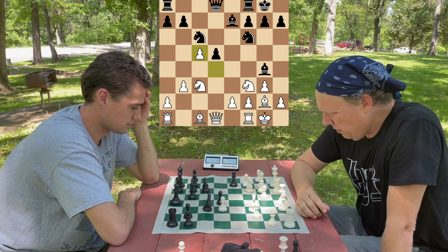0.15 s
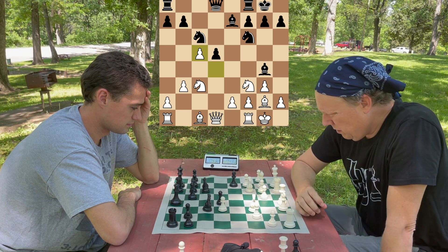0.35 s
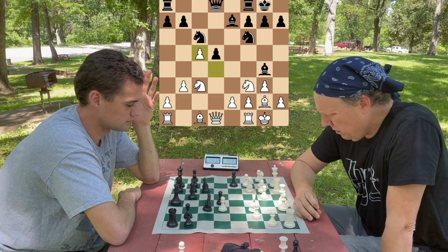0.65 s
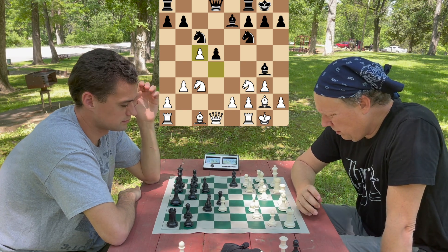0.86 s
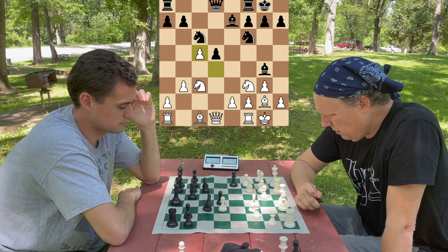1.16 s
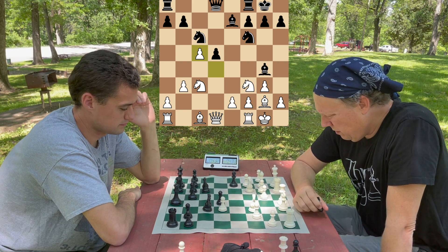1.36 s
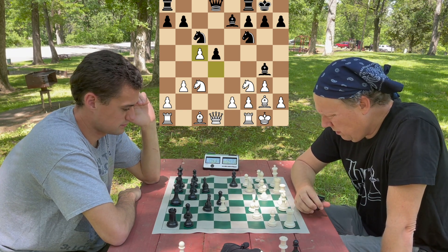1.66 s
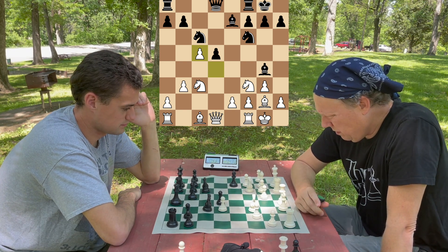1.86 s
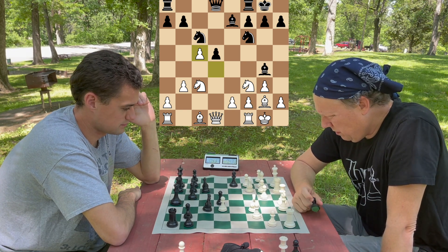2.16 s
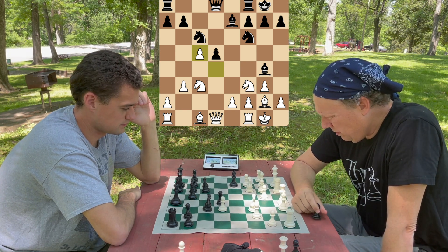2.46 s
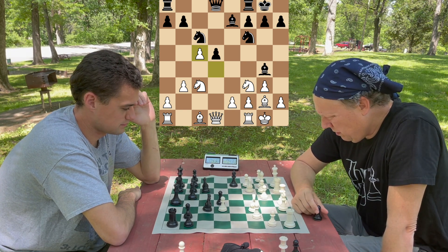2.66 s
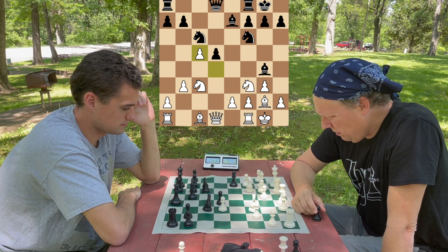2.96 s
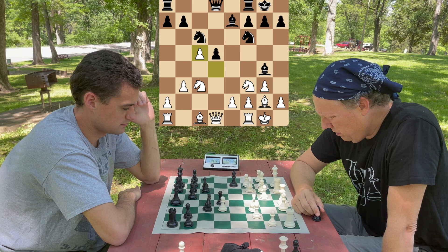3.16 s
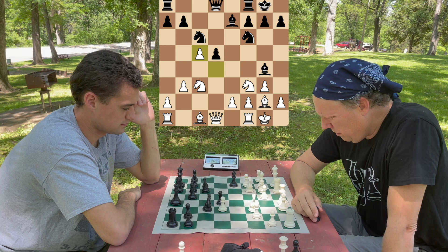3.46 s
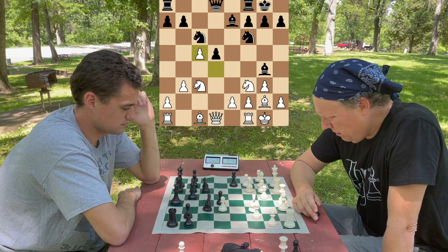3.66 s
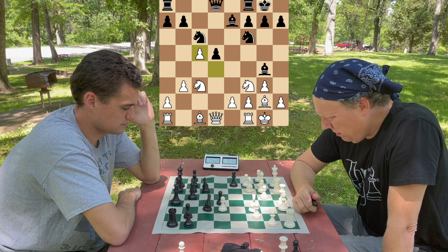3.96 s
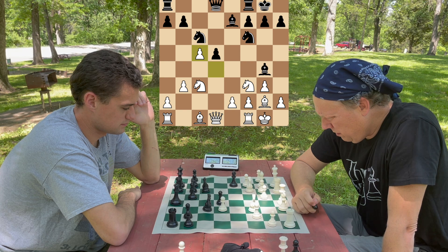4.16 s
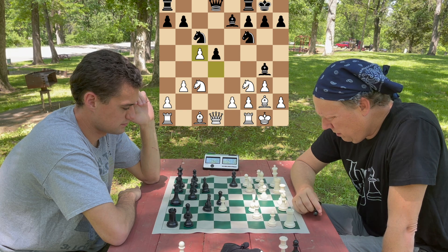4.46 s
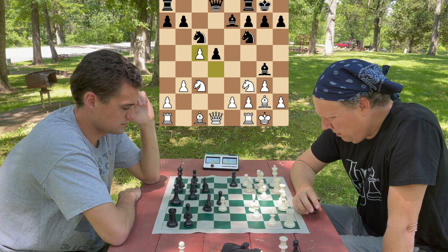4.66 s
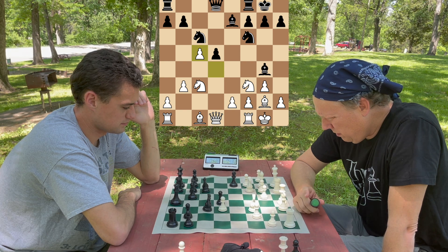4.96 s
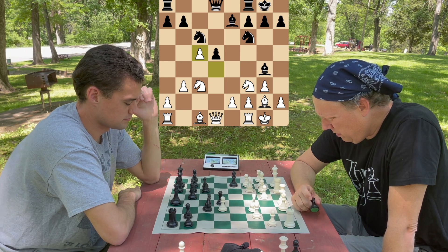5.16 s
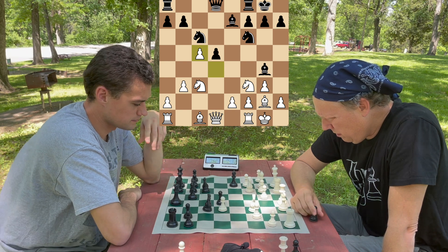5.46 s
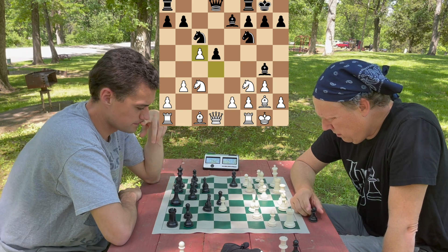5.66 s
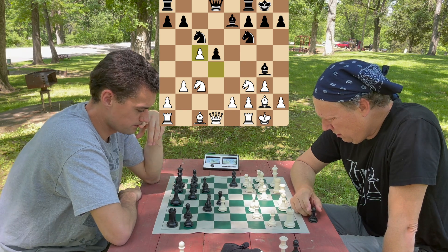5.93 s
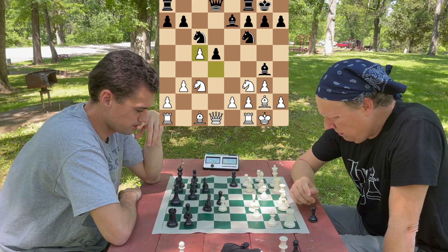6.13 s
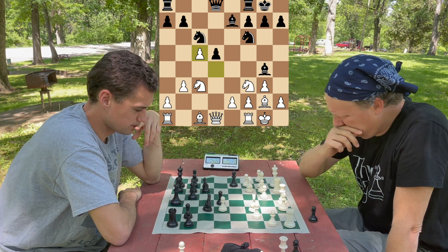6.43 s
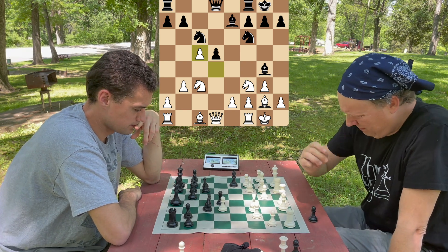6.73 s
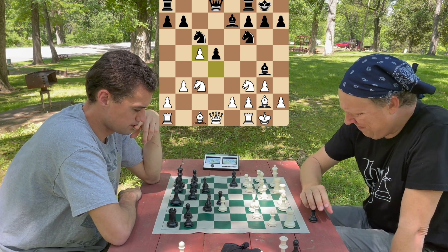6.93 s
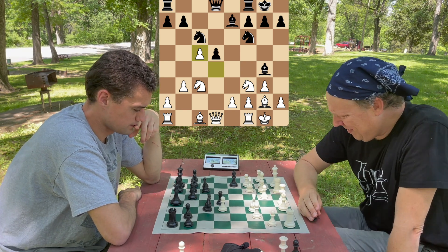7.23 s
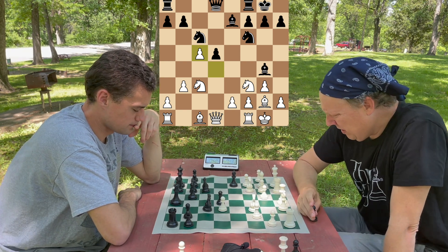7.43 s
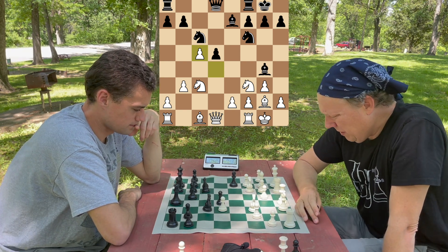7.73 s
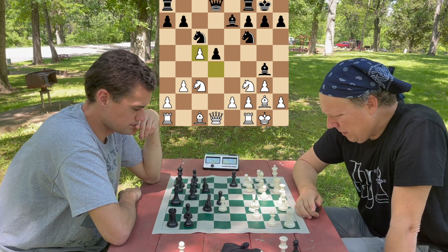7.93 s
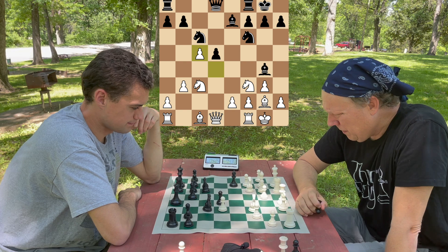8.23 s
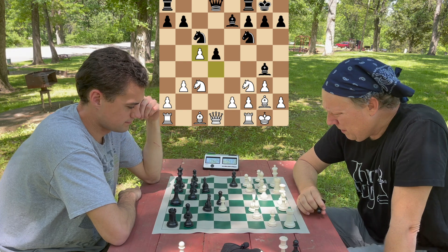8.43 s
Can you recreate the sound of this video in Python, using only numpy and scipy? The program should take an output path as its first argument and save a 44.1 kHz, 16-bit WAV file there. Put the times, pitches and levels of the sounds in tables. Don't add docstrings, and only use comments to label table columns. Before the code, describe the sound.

Close at an outdoor wooden table, a weighted plastic piece lands with a bright, sharp clack early on, then small ticks follow. A second, softer and duller knock comes past the middle, then faint bumps and cloth rustle. A nearby songbird whistles falling notes in the first two seconds, echoing off trees; farther birds continue over distant traffic hum and low wind rumble.

```python
import sys
import numpy as np
from scipy import signal
from scipy.fft import rfft, irfft
from scipy.io import wavfile
from scipy.ndimage import uniform_filter1d

SR = 44100
rng = np.random.default_rng(int(sys.argv[2]) if len(sys.argv) > 2 else 0)


def gain_from_db(level_db):
    decades = np.asarray(level_db, float) / 20
    return 10 ** decades


def generate_wav(signal):
    frames = np.transpose(np.atleast_2d(signal))
    scaled = np.clip(frames, -1, 1) * 32767
    pcm = np.round(scaled).astype(np.int16)
    wavfile.write(sys.argv[1], SR, pcm)


N = 378819

# (time [s], strength [dB], contact time [ms], plastic crack [dB])
FIRST_KNOCK = [
    (.5439, -14, 0.29, -18),
    (.5470, -22, 0.34, -35),
    (.5500, -26, 0.66, -39),
]
SECOND_KNOCK = [
    (5.3183, -18, 0.4, -44),
    (5.3214, -24.5, 0.51, -51),
    (5.3240, -23.5, 0.32, -54),
]
# (frequency [Hz], level [dB], time to fall 60 dB [s])
FIRST_PLANKS = [(435, -6, 0.073), (507, 0, 0.08), (690, -14, 0.088), (914, -22.5, 0.068), (1160, -10, 0.05),
                (1328, 0.5, 0.034), (1970, 1.5, 0.015), (2400, -2, 0.028), (2600, -0.5, 0.015),
                (3150, -3, 0.018)]
SECOND_PLANKS = [(277, -9, 0.11), (429, 2, 0.053), (486, -5, 0.074), (680, -30, 0.162), (850, -23, 0.12),
                 (947, -8, 0.057), (1120, -2.5, 0.022), (1317, 3.5, 0.024), (1600, -12, 0.024),
                 (2090, 3, 0.0043), (2900, -3.5, 0.0039)]
# (frequency [Hz], level [dB], time to fall 60 dB [s])
PLASTIC = [
    [(4600, -5.5, 0.014), (5070, 9, 0.0076), (5200, 9, 0.0056), (5560, 3.5, 0.0063), (6250, -1.5, 0.0066), (8390, -14, 0.01), (9430, -19, 0.0089), (10700, -32, .006), (12200, -21, 0.01), (13400, -30, 0.0047), (15000, -28, .007)],
    [(4500, -1.5, 0.0115), (5300, -4, 0.0082), (6600, -4, 0.0082), (8400, -6, 0.0197), (9000, -4.5, 0.021), (10900, -14.5, 0.0107), (12370, -8, 0.0195), (15300, -13.5, .012)],
]
# (time [s], peak level [dB], centre [Hz], plastic ring [dB])
TICKS = [(0.816, -56.5, 3490, -33.5), (0.9198, -46, 4000, -16), (1.5595, -39, 3350, -23),
         (1.9778, -39.5, 4100, -41), (1.9790, -41, 2400, -45), (1.982, -46, 3580, -41),
         (2.9644, -59, 3520, -27), (3.5827, -58, 3520, -24), (4.2328, -57, 3660, -28),
         (4.2777, -52, 3440, -31.5), (4.3785, -50, 3680, -31.5), (4.5719, -60, 4130, -10),
         (5.222, -58, 3700, -21), (5.2255, -45, 3900, -39.5), (5.226, -43, 2000, -45),
         (5.3396, -46, 3450, -34.5), (7.009, -59, 3420, -28), (7.3864, -57, 5000, -26),
         (7.66, -56, 2300, -40), (7.043, -63, 6000, -30), (7.6241, -59.5, 4090, -24),
         (8.2058, -53.5, 3490, -8), (8.3706, -53.5, 4400, -29)]
# (time [s], peak level [dB], frequency [Hz], time to fall 60 dB [s])
THUMPS = [
    (0.545, -26, 102.6, 0.058),
    (.545, -36, 32.4, 0.27),
    (5.319, -37.5, 108.6, 0.081),
    (7.039, -39, 421, 0.028),
    (7.36, -43.5, 477.5, 0.042),
    (7.549, -56, 337, 0.075),
]
# (time [s], length [s], centre [Hz], level [dB])
RUBS = [(2.849, .06, 11000, -85), (3.545, 0.064, 9900, -81), (6.175, 0.068, 12500, -80),
        (6.18, .05, 7500, -83), (6.286, 0.046, 12500, -80), (6.56, .07, 14200, -82),
        (6.509, 0.07, 13000, -78), (6.581, 0.057, 12400, -82), (7.0, 0.056, 12000, -84.5),
        (7.337, 0.037, 11000, -77), (7.508, 0.088, 12500, -80), (7.644, .025, 12000, -82),
        (6.522, .04, 7000, -80), (6.6, .03, 7500, -83), (7.328, .04, 6000, -79), (7.54, .04, 6500, -79)]
# (time [s], length [s], frequency [Hz], level [dB])
METAL_PARTIALS = [
    (1.955, 0.13, 4500, -67.5),
    (1.975, .065, 7150, -81),
    (1.95, .1, 11600, -84),
]

# (time [s], pitch [Hz], level [dB])
SWOOPS = [
    [(0.166, 3696, -70.5), (0.2, 3399, -54), (0.214, 3176, -48.5), (0.226, 2682, -61), (0.248, 2047, -64)],
    [(1.145, 3656, -77), (1.151, 3648, -64.5), (1.179, 3409, -52.5), (1.197, 3122, -49.5),
     (1.235, 2040, -69)],
    [(1.618, 3560, -76), (1.646, 3256, -52.5), (1.66, 2959, -51), (1.702, 2772, -58), (1.735, 2762, -64)],
    [(5.33, 3230, -74), (5.35, 3080, -69), (5.365, 2900, -62.5), (5.385, 2660, -74)],
    [(6.995, 3350, -78), (7.03, 3010, -67.5), (7.05, 2690, -64), (7.07, 2640, -77)],
]
# (time [s], length [s], middle pitch [Hz], level [dB])
NEAR_DROPS = [(.035, .04, 2570, -59), (.068, 0.026, 2400, -54.5), (.09, .029, 2430, -56),
              (.574, 0.009, 2990, -47), (.64, .0087, 2890, -49.5), (1.006, 0.032, 2600, -52.5),
              (1.04, 0.0274, 2540, -52), (1.07, 0.03, 2504, -51.5), (1.09, 0.012, 2483, -50),
              (1.535, 0.032, 2430, -54)]
NEAR_FLICKS = [(.514, 0.0094, 3010, -51.5), (.527, 0.018, 2980, -45), (.592, .016, 3090, -42)]
NEAR_ARCHES = [(1.495, .013, 3530, -57.5), (1.512, .019, 3216, -46.5)]
NEAR_HELD = [(.005, 0.047, 2610, -68), (.549, 0.025, 3423, -44), (.7, 0.058, 3470, -65),
             (.775, 0.018, 3480, -64), (.583, .006, 3250, -55), (.61, .015, 3430, -46),
             (.624, .017, 3520, -50), (.64, 0.052, 3510, -61), (.662, 0.049, 2263, -55.5),
             (.896, 0.051, 3130, -64), (.986, 0.03, 2650, -58), (1.565, 0.023, 2600, -56)]
# (time [s], length [s], middle pitch [Hz], level [dB])
FAR_DROPS = [(2.08, 0.029, 3430, -61.5), (2.195, 0.02, 3480, -64), (4.17, .0423, 2000, -68.5),
             (7.503, 0.0197, 3130, -60), (7.57, .03, 3300, -76), (7.62, .03, 2600, -73),
             (7.325, .025, 3200, -69), (7.113, .02, 4200, -81), (7.1, .02, 3200, -69), (7, .02, 3000, -69),
             (6.7, .015, 2950, -69)]
FAR_SAGS = [(2.16, 0.026, 4070, -69), (2.8, 0.094, 2080, -73), (3.05, .03, 4220, -78),
            (5.1, 0.048, 2860, -76), (5.5, .1, 3500, -73), (6.49, 0.065, 3220, -71),
            (7.25, 0.036, 2860, -69), (7.28, .069, 4120, -75), (7.43, 0.029, 2910, -68),
            (7.47, .038, 4050, -72), (7.76, 0.036, 3240, -72), (7.92, 0.019, 2310, -65),
            (8.48, .028, 4500, -73), (8.5, .046, 2590, -76), (8.572, 0.021, 4350, -66)]
FAR_LIFTS = [(2.045, 0.031, 4080, -63.5), (3.15, .06, 3400, -81), (3.22, .06, 3750, -79),
             (3.27, .05, 4400, -78), (3.32, .045, 3450, -78), (3.19, .03, 4200, -80),
             (3.27, .03, 3050, -81), (4.25, .054, 2770, -73), (6.22, .05, 3480, -80),
             (6.41, .0262, 3320, -73), (7.52, 0.023, 2400, -69)]
FAR_HELD = [(1.02, 0.057, 10900, -86), (3.1, .08, 2580, -75), (5.6, .2, 5000, -83), (6.3, .07, 5300, -82),
            (7.27, .3, 5200, -83), (5.93, .06, 4400, -79), (6.04, .06, 3400, -75), (6.66, .06, 2600, -74),
            (7.88, .07, 2500, -77), (7.13, .1, 3500, -78), (7.55, .12, 4050, -80), (5.27, .132, 10940, -86),
            (5.45, .12, 8300, -88), (7.69, .04, 3150, -75), (7.62, .08, 5350, -78), (8.4, .03, 3250, -73),
            (5.398, .012, 2950, -70), (5.9, .01, 2900, -68), (5.422, 0.011, 2950, -72),
            (6.68, .1, 3560, -78), (5.35, .08, 7900, -82)]
FAR_PLUNGES = [(2.74, .0138, 8750, -71), (5.393, .017, 8660, -79)]
FAR_HOOKS = [(8.265, 0.059, 3470, -63.5)]
FAR_GLIDES = [(8.4, .065, 2920, -67), (4, .05, 2650, -74)]
FAR_SETTLES = [(5.915, .085, 2960, -71), (6.1, 0.073, 2960, -71), (6.58, .075, 2590, -71.5),
               (7.8, .093, 2560, -71)]
DROP, FLICK, ARCH, HELD = (0.093, -0.072), (-0.14, 0.12), (-0.17, -0.12), (-.015, .003)
FAR_DROP, SAG, LIFT, PLUNGE = (0.121, -.1), (.03, -.025), (-0.064, 0.028), (0.185, -0.082)
HOOK, GLIDE, SETTLE = (0.1, -.003), (0.081, -0.065), (-0.0464, -0.0064)
# (time [s], level [dB])
BUZZY_CALLS = [(2.9, -74), (3.385, -70.5), (3.905, -71), (4.435, -71), (5.0, -75), (5.46, -75)]
# (share of its length [0-1], pitch [Hz], level [dB])
BUZZY_SHAPE = [(0, 4397, -4), (.14, 4700, -0.5), (.38, 3650, 0), (.48, 3150, 0), (.64, 3620, 2.5),
               (.74, 3600, -11), (.84, 3270, 3), (1, 3150, -3)]
# (time [s], level [dB])
CHATTER_LEVEL = [(0, -85), (2, -95), (3.2, -82), (4.3, -84), (5.0, -92), (5.55, -80), (6.1, -76.5),
                 (6.9, -81.5), (7.5, -73), (8.0, -76), (8.59, -75.5)]

# (time [s], wind on the microphone [dB], breeze in the leaves [dB], traffic [dB])
AIR = [(0, 0.5, 1, -59.5), (.35, 2.5, 3, -59.5), (1.2, 1.5, 2, -59.5), (2.1, 0, 2.5, -60),
       (2.6, 0.5, -1, -60.5), (3.2, -0.5, 4, -62), (3.6, 0.5, 0, -62.5), (4.1, 0, -1, -63),
       (4.5, 1, 4.5, -63.5), (4.9, -0.5, -2.5, -63), (5.4, 0, 5, -63.5), (5.8, -1.5, 0.5, -62.5),
       (6.94, -0.5, -1, -62.5), (7.5, 1.5, 9, -62), (7.85, 0, 3, -62.5), (8.59, 1, 3, -62)]
# (frequency [Hz], level per Hz [dB])
WIND_COLOUR = [(8.8, -37.5), (15, -1), (27, 4), (44, -3.5), (80, -0.5), (151, -9.5), (211, -15.5),
               (228, -15.5), (249, -27), (300, -23.5), (390, -36.5), (660, -120)]
TRAFFIC_COLOUR = [(120, -31), (200, 0), (227, -5.5), (248, -10), (386, -8), (567, -8.5), (628, -4.5),
                  (806, -6), (1070, -7.5), (1160, -8.5), (2060, -15), (2290, -19.5), (3000, -28),
                  (3900, -32), (6600, -120)]
LEAVES_COLOUR = [(1500, -31.5), (2500, -1), (4000, -4.5), (5500, -10), (7300, -16.5), (10000, -19),
                 (14700, -20.5), (15300, -37), (16200, -48.5)]
# (frequency [Hz], width [Hz], level [dB])
ENGINES = [
    (72, 17.3, -61.5),
    (667, 40, -75),
]
# (time [s], level [dB])
PASSING_VEHICLE = [
    (0, -83),
    (2.0, -84),
    (2.4, -73),
    (3.0, -64.5),
    (3.2, -85),
    (8.59, -89),
]


def clock(seconds):
    return np.arange(int(seconds * SR)) / SR


def add(track, at, sound):
    start = max(int(at * SR), 0)
    track[start:start + len(sound)] += sound[:N - start]


def fade_away(t60, t):
    return np.exp(-np.log(1000) * t / t60)


def ring(hz, t60, t):
    return np.sin(2 * np.pi * hz * t) * fade_away(t60, t)


def sweep(hz):
    return np.sin(2 * np.pi * np.cumsum(hz) / SR)


def passband(x, hz, width):
    edges = np.clip([hz - width / 2, hz + width / 2], 500, 20000)
    y = signal.sosfilt(signal.butter(3, edges, "bandpass", fs=SR, output="sos"), x)
    return y / np.abs(y).max()


def walk(rate):
    hold = int(SR / rate)
    steps = np.repeat(rng.standard_normal(N // hold + 1), hold)
    smooth = uniform_filter1d(uniform_filter1d(steps, hold), hold)
    return 0.81 * smooth[:N]


def echoes(x, t60, wet_db, delay):
    t = clock(0.93)
    tail = rng.standard_normal(len(t)) * fade_away(t60, t) * (t > delay)
    tail = tail / np.sqrt(np.sum(tail ** 2))
    return gain_from_db(wet_db) * signal.fftconvolve(x, tail)[:N]


def swell(hz, t, lag=0.0079):
    return 1 - np.exp(-t / (lag * (500 / hz) ** 3))


def knock(contacts, planks, plastic):
    wood, crack, t = np.zeros(N), np.zeros(N), clock(.3)
    grits = rng.standard_normal((len(contacts), 200)) * np.exp(-t[:200] / .00006)
    grits = grits / np.abs(rfft(grits, axis=1))[:, 20:45].mean(axis=1, keepdims=True)
    plastic_ring = sum((-1) ** k * gain_from_db(db) * ring(hz, t60, t) for k, (hz, db, t60) in enumerate(plastic))
    chances = rng.standard_normal((len(contacts), len(planks)))
    for (at, db, contact_ms, crack_db), chance, grit in zip(contacts, chances, grits):
        tilt_db = 4.3 * (at > contacts[0][0])
        body = np.zeros(len(t))
        for (hz, mode_db, t60), luck in zip(planks, chance):
            level_db = mode_db + 2.8 * luck + tilt_db * min(np.log2(hz / 1100), 0)
            body += gain_from_db(level_db) * ring(hz, t60, t) * swell(hz, t)
        push = np.sin(np.pi * np.clip(t[:90] * 1000 / contact_ms, 0, 1)) ** 2
        add(wood, at, -gain_from_db(db) * np.convolve(body, push / push.sum()))
        add(crack, at, gain_from_db(crack_db - 8.5) * np.convolve(plastic_ring, grit))
    wood = signal.sosfilt(signal.butter(2, 240, "highpass", fs=SR, output="sos"), wood)
    dull = signal.sosfilt(signal.butter(6, 3500, fs=SR, output="sos"), wood)
    nearby = echoes(dull, t60=0.035, wet_db=-11.5, delay=0.00335)
    trees = echoes(dull, t60=0.88, wet_db=-34, delay=0.017)
    return wood + crack + nearby + trees


def ticks(width_hz=1930, t60=0.016):
    out, t = np.zeros(N), clock(0.24)
    for at, db, hz, ring_db in TICKS:
        burst = rng.standard_normal(len(t)) * fade_away(t60, t)
        add(out, at, gain_from_db(db - 6.5) * passband(burst, hz, width_hz))
        add(out, at, gain_from_db(db + ring_db) * ring(8450, 0.01, t))
    return out


def thumps():
    out, t = np.zeros(N), clock(0.24)
    for at, db, hz, t60 in THUMPS:
        add(out, at, gain_from_db(db) * ring(hz, t60, t) * (1 - np.exp(-t / 0.0031)))
    return out


def rubs(width_share=.5):
    out = np.zeros(N)
    for at, length, hz, db in RUBS:
        u = clock(length) / length
        hiss = passband(rng.standard_normal(int(0.24 * SR)), hz, width_share * hz)[:len(u)]
        add(out, at, gain_from_db(db + 11) * np.sin(np.pi * u) * hiss)
    return out


def singing_metal(beat_hz=27):
    out = np.zeros(N)
    for at, length, hz, db in METAL_PARTIALS:
        t = clock(length)
        throb = np.sin(np.pi * beat_hz * (t + at - 1.944))
        envelope = np.sin(np.pi * t / length) ** .4
        add(out, at, gain_from_db(db) * envelope * throb * np.sin(2 * np.pi * hz * t))
    return out


def notes_of(*kinds):
    return [(at, length, hz * (1 + first), hz, hz * (1 + last), db)
            for rows, (first, last) in kinds for at, length, hz, db in rows]


def whistle(notes, edge, waver):
    out = np.zeros(N)
    shake = np.resize(1 + waver * walk(140), N + SR)
    for at, length, first, middle, last, db in notes:
        u = clock(length) / length
        hz = first * (1 - u) * (1 - 2 * u) + 4 * middle * u * (1 - u) + last * u * (2 * u - 1)
        hz = hz * shake[int(at * SR):][:len(u)]
        add(out, at, gain_from_db(db) * np.sin(np.pi * u) ** edge * sweep(hz))
    return out


def swoops():
    out = np.zeros(N)
    for s, hz, db in map(np.transpose, SWOOPS):
        t = clock(s[-1] - s[0]) + s[0]
        fade = np.clip(np.minimum(t - s[0], s[-1] - t) / 0.0038, 0, 1)
        smooth_hz = uniform_filter1d(np.interp(t, s, hz), size=400, mode="nearest")
        add(out, s[0], fade * gain_from_db(np.interp(t, s, db) + 6.5) * sweep(smooth_hz))
    return out


def buzzy_calls(length_s=.115, buzz_hz=90, depth=.06):
    out, t = np.zeros(N), clock(length_s)
    u = t / length_s
    share, shape_hz, shape_db = np.transpose(BUZZY_SHAPE)
    for at, db in BUZZY_CALLS:
        drift = 0.028 * np.cumsum(rng.standard_normal(len(t)))
        flutter = np.sin(2 * np.pi * buzz_hz * t + drift)
        hz = np.interp(u, share, shape_hz) * (1 + depth * flutter)
        level_db = db + np.interp(u, share, shape_db) + 3.0 * flutter
        add(out, at, gain_from_db(level_db) * np.sin(np.pi * u) ** .3 * sweep(hz))
    return out


def chatter(count=2000):
    when, length, pitch, bend, size = rng.random((count, 5)).T
    at = when * N / SR
    hz = 2400 + 2200 * pitch ** 1.3
    first, last = hz * (1 + .12 * bend), hz * (1.03 - 0.23 * bend)
    db = np.interp(at, *np.transpose(CHATTER_LEVEL)) - 6 + 4.5 * size
    return whistle(zip(at, .01 + 0.0249 * length, first, hz, last, db), edge=0.83, waver=.03)


def near_bird():
    song = notes_of((NEAR_DROPS, DROP), (NEAR_FLICKS, FLICK), (NEAR_ARCHES, ARCH), (NEAR_HELD, HELD))
    near = (whistle(song, edge=0.27, waver=0.011) + swoops()) * gain_from_db(0.68 * walk(90))
    deep_woods = echoes(near, t60=0.87, wet_db=-7.5, delay=0.013)
    close_trunks = echoes(near, t60=0.14, wet_db=-5.5, delay=0.0045)
    return near + deep_woods + close_trunks


def far_birds():
    calls = notes_of((FAR_DROPS, FAR_DROP), (FAR_SAGS, SAG), (FAR_LIFTS, LIFT), (FAR_HELD, HELD),
                     (FAR_PLUNGES, PLUNGE), (FAR_HOOKS, HOOK), (FAR_GLIDES, GLIDE), (FAR_SETTLES, SETTLE))
    breaking_up = gain_from_db(1.0 * walk(60) + 4.2 * walk(250))
    far = (whistle(calls, edge=0.17, waver=0.023) + buzzy_calls()) * breaking_up
    close_trunks = echoes(far, t60=0.062, wet_db=-0.5, delay=0.0012)
    deep_woods = echoes(far, t60=0.74, wet_db=-5, delay=0.012)
    crowd = echoes(chatter(), t60=.3, wet_db=1.5, delay=0.0026)
    return 0.57 * far + close_trunks + deep_woods + crowd


def coloured(points):
    hz, db = np.transpose(points)
    log_f = np.log(np.arange(N // 2 + 1) * SR / N + 1e-9)
    gain = gain_from_db(np.interp(log_f, np.log(hz), db, left=-150, right=-150))
    x = irfft(rfft(rng.standard_normal(N)) * gain, N)
    return x / x.std()


def drone(hz, width):
    return coloured([(hz - 1.6 * width, -30), (hz - width / 2, -3), (hz, 0),
                     (hz + width / 2, -3), (hz + 1.6 * width, -30)])


def park():
    t = np.arange(N) / SR
    s, *columns = np.transpose(AIR)
    wind_db, breeze_db, traffic_db = (np.interp(t, s, column) for column in columns)
    wind = gain_from_db(-51.5 + wind_db + 1.5 * walk(9.8)) * coloured(WIND_COLOUR)
    traffic = gain_from_db(traffic_db + 1.02 + 0.86 * walk(6)) * coloured(TRAFFIC_COLOUR)
    leaves = gain_from_db(-77 + 0.35 * breeze_db + 0.57 * walk(7.1)) * coloured(LEAVES_COLOUR)
    surge_db = 2.4 * (traffic_db - traffic_db.mean())
    engines = sum(gain_from_db(db + surge_db) * drone(hz, width) for hz, width, db in ENGINES)
    passing_db = np.interp(t, *np.transpose(PASSING_VEHICLE)) + 2.5 * walk(12)
    passing = gain_from_db(passing_db) * drone(hz=1062, width=110)
    return wind + traffic + leaves + engines + passing


def scene():
    knocks = knock(FIRST_KNOCK, FIRST_PLANKS, PLASTIC[0]) + knock(SECOND_KNOCK, SECOND_PLANKS, PLASTIC[1])
    handling = ticks() + thumps() + rubs() + singing_metal()
    return (knocks + handling + near_bird() + far_birds() + park())[None]


def band_limit(x):
    return signal.sosfilt(signal.butter(12, 16080, fs=SR, output="sos"), x)


def record(dry):
    mix = signal.sosfilt(signal.ellip(8, .2, 60, 15900, fs=SR, output="sos"), dry)
    return band_limit(mix)


dry = scene()
out = record(dry)
generate_wav(out)
```